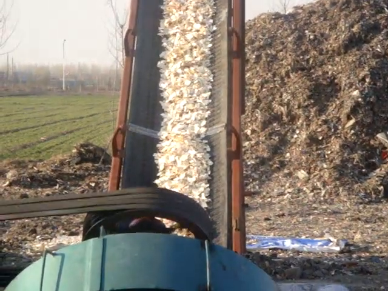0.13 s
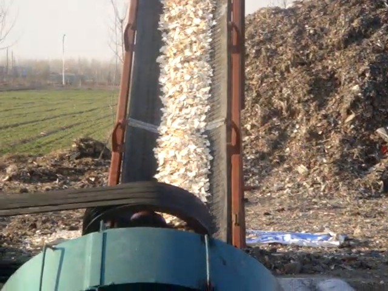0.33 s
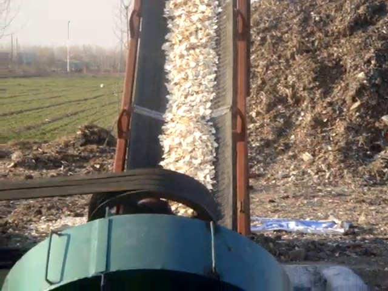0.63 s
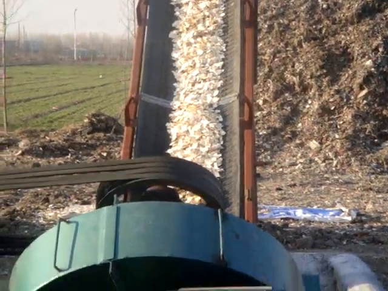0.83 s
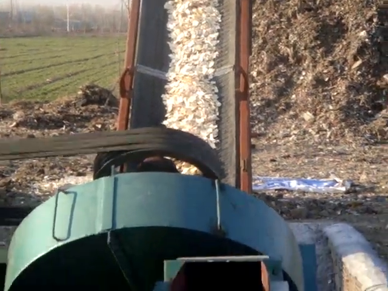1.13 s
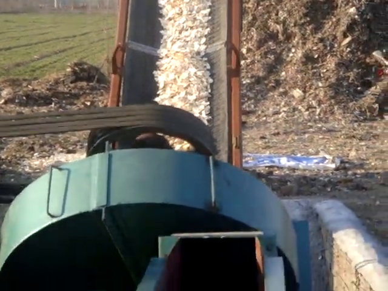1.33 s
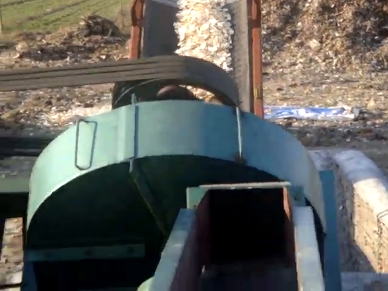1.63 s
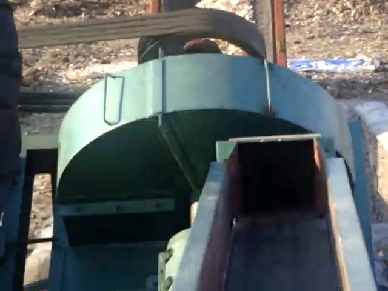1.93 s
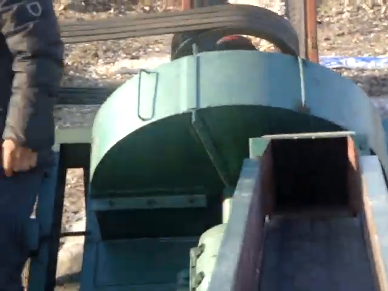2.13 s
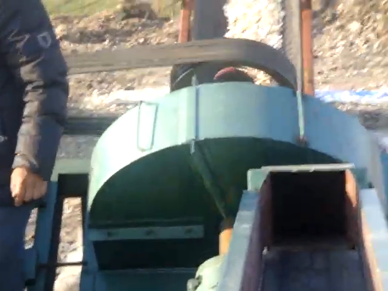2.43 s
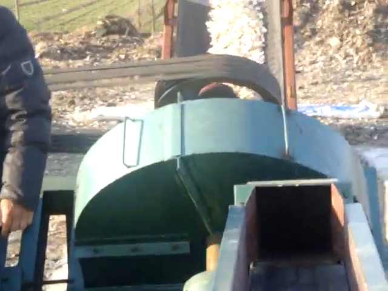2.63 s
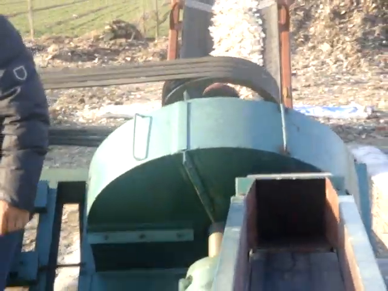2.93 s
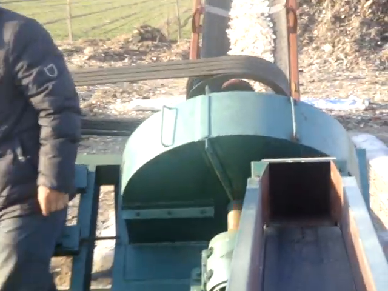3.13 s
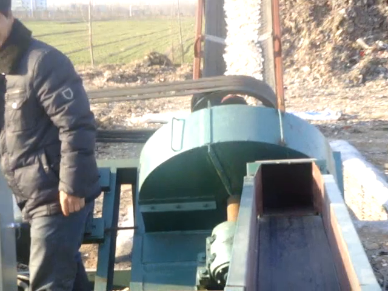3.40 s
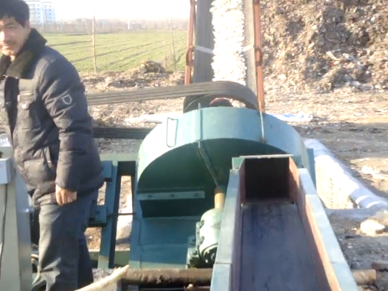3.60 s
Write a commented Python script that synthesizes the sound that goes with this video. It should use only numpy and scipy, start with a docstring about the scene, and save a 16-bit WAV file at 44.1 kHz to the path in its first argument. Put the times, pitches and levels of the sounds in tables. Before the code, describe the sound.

A large wood chipper roars and drones outdoors throughout, slowing slightly, with motor whine, a metallic ring and rapid swishing ticks. Dull wooden knocks come at intervals, and chips rattle over steel in short bursts until about 2.1 seconds. Wood cracks at 1.3 seconds. The roar peaks around 3 seconds, the strongest knock lands at 3.4, then the cutting eases under a thin hiss.

```python
"""A belt-driven disc chipper eats wood outdoors, its six-knife disc slowly losing speed under the load.
The knives roar and drone in the steel hood, fibres snap, the motor whines and a steel panel sings.
Once a turn the disc catches with a tick and a swish. Thick pieces knock, one cracks, and chips spray
over steel in short bursts; near the end the cut eases off under a thin hiss."""
import sys
import numpy as np
from scipy import signal
from scipy.fft import rfft, irfft, next_fast_len
from scipy.io import wavfile
from scipy.ndimage import uniform_filter1d, minimum_filter1d, map_coordinates

SR = 44100
rng = np.random.default_rng(int(sys.argv[2]) if len(sys.argv) > 2 else 0)


def bounce(signal):
    """Save signal as a 16-bit WAV file at the path given by the first command-line argument."""
    frames = np.transpose(np.atleast_2d(signal))
    limited = np.clip(frames, -1, 1)
    pcm = np.round(limited * 32767).astype(np.int16)
    wavfile.write(sys.argv[1], SR, pcm)


N = 165816
KNIVES = 6


def amp(db):
    """Decibels to gain."""
    return 10 ** (np.asarray(db) / 20)


def unit(x):
    """Scale to rms 1."""
    return x / np.sqrt(np.mean(x ** 2) + 1e-20)


def clock():
    """Time of every sample in seconds."""
    return np.arange(N) / SR


def curve(rows):
    """An automation lane: (t/s, value) rows joined by straight lines."""
    return np.interp(clock(), *np.transpose(rows))


def wobble(rate):
    """A smooth random curve, rate knots a second."""
    return map_coordinates(rng.standard_normal(int(N * rate / SR) + 4), [clock() * rate])


def filtered(x, response):
    """Filter x by a gain given as a function of frequency."""
    size = next_fast_len(N + SR // 2)
    return irfft(rfft(x, size) * response(np.fft.rfftfreq(size, 1 / SR)), size)[:N]


def colour(x, eq):
    """Shape x with an EQ curve of (f/Hz, relative level/dB) rows, then scale to rms 1."""
    hz, db = np.transpose(eq)
    return unit(filtered(x, lambda f: amp(np.interp(np.log(f + 1), np.log(hz), db))))


def noise(eq):
    """Coloured noise of rms 1."""
    return colour(rng.standard_normal(N), eq)


def ringing(x, resonances):
    """Each (f/Hz, width/Hz, boost/dB) resonance lifts its own band of x."""
    def bell(f, hz, width, db):
        damping = 1j * f * width / 2
        return 1 + (amp(db) - 1) * damping / (hz * hz - f * f + damping)
    return filtered(x, lambda f: np.prod([bell(f, *row) for row in resonances], axis=0))


def scatter(cycles, spread_db):
    """A new random gain for every cycle."""
    index = np.floor(cycles - np.floor(cycles[0])).astype(int)
    return amp(spread_db * rng.standard_normal(size=512)[index])


def tone(cycles, db, waver_db, drift_rad, rate):
    """A sine that wavers around the rms level db and drifts in phase."""
    level = amp(db + waver_db * wobble(rate)) * np.sqrt(2)
    return level * np.sin(2 * np.pi * (cycles + rng.random()) + drift_rad * wobble(rate))


def blow(start_s, decay_s, attack_s=0.0062):
    """Envelope of a woody hit: a rounded attack and an exponential tail."""
    age = np.maximum(clock() - start_s, 0)
    return (1 - np.exp(-age / attack_s)) * np.exp(-age / decay_s)


# EQ of the cutting roar (f/Hz, relative level/dB)
ROAR_EQ = [(25, -24), (70, -24.5), (130, -16.5), (200, -11), (400, -12), (520, -2), (750, -0.5),
           (1250, -2.5), (1900, -10), (2500, -14.5), (3200, -17), (4200, -24.5), (6000, -30),
           (10000, -38.5)]
# resonances of the steel hood, shared with the knocks (f/Hz, width/Hz, boost/dB)
HOOD_MODES = [(172.2, 26, 4), (209.6, 13, 5), (258.8, 21.4, 11.5), (334.5, 17.5, 14), (354.8, 18, 8.5),
              (512.5, 33, 6), (624, 58, 3), (823, 64, 5), (1642, 40, 4.5)]
# gain ride on the roar's upper mids (t/s, level/dB)
UPPER_MID_RIDE = [(0, -2), (1.2, -1), (1.7, .5), (2.3, -0.5), (3.1, 2), (3.5, 0), (3.76, 1.5)]

def cutting(turns, decay_gaps=0.75, depth=0.36):
    """Every knife tears off a slice: a burst of noise that rings in the hood."""
    cuts = turns * KNIVES
    bite = unit(np.exp(-(cuts % 1) / decay_gaps) * scatter(cuts, spread_db=0.5))
    tearing = (1 - depth + depth * bite) * rng.standard_normal(N)
    roar = unit(ringing(colour(tearing, ROAR_EQ), HOOD_MODES))
    upper_mids = filtered(roar, lambda f: (f > 870) & (f < 1410))
    return roar + (amp(curve(UPPER_MID_RIDE)) - 1) * upper_mids


# EQ of the snapping fibres (f/Hz, relative level/dB)
SPLINTER_EQ = [(600, -4), (1600, -15.5), (3300, 2), (5000, -16.5), (10000, -6.5)]

def splinters(snaps_per_s=120, decay_s=0.001):
    """Fibres snap at random moments, each a tiny grain of noise."""
    snaps = (rng.random(N) < snaps_per_s / SR) * amp(2 * rng.standard_normal(N))
    envelope = signal.lfilter([1], [1, -np.exp(-1 / (decay_s * SR))], snaps)
    return amp(-21.5) * colour(envelope * rng.standard_normal(N), SPLINTER_EQ)


KNIFE_RATE_DB = -32.5  # the drone's fundamental
# partials of the drone (multiple of the knife rate, level/dB added to the fader)
DRONE_PARTIALS = [(1, KNIFE_RATE_DB), (3, -28.5), (4, -28.5), (5, -27), (6, -16.5), (7, -13.5), (8, -18),
                  (9, -26.5), (10, -29), (11, -28.5), (13, -26)]
# fader of the drone (t/s, level/dB)
DRONE_FADER = [(0, -13), (.9, -7), (1.15, -17), (1.55, -9), (2.1, -8.5), (2.7, -9), (3.4, -3.5),
               (3.53, -26), (3.76, -22)]
# fader of the hum at twice the knife rate (t/s, level/dB)
HUM_FADER = [(0, -49.5), (2.55, -36.5), (3.15, -23.5), (3.45, -34), (3.76, -39)]

def drone(turns):
    """The passing knives drone in wavering harmonics of the knife rate."""
    cuts, level = turns * KNIVES, curve(DRONE_FADER)
    hum = tone(2 * cuts, curve(HUM_FADER), waver_db=2.5, drift_rad=0.32, rate=5)
    return hum + sum(tone(k * cuts, level + db, waver_db=2.5, drift_rad=0.35, rate=9.33)
                     for k, db in DRONE_PARTIALS)


# partials of the whine (multiple of the disc rate, level/dB added to the fader)
WHINE_PARTIALS = [(56.9, 1.5), (85.4, -4), (114.3, -16)]
# fader of the whine (t/s, level/dB)
WHINE_FADER = [(0, -23.5), (.9, -23), (1.2, -33), (2.4, -21.5), (2.9, -34), (3.4, -31), (3.76, -50)]

def motor(turns):
    """The motor's whine follows the disc, loosely, through the slipping belts."""
    return sum(tone(k * turns, curve(WHINE_FADER) + db, waver_db=3, drift_rad=0.85, rate=8)
               for k, db in WHINE_PARTIALS)


# fader of the panel, drawn to swell as the slowing machine nears its pitch (t/s, level/dB)
PANEL_FADER = [(0, -38), (1.8, -31), (2.45, -23), (2.9, -31), (3.38, -23), (3.58, -28), (3.76, -25)]

def panel(pitch_hz=820.5, octave_db=-14):
    """A steel panel sings at its own steady pitch, with a faint octave on top."""
    cycles, level = pitch_hz * clock(), curve(PANEL_FADER)
    return sum(tone(k * cycles, level + db, waver_db=3.5, drift_rad=0.4, rate=14)
               for k, db in [(1, 0), (2, octave_db)])


# EQ of the sharp tick (f/Hz, relative level/dB)
TICK_EQ = [(300, -21), (1500, -17), (3200, 6.5), (5000, -15.5), (10000, -19)]
# EQ of the airy swish (f/Hz, relative level/dB)
SWISH_EQ = [(1500, -36), (3500, 1), (5000, 1), (7000, 1), (10000, -0.5)]

def rub(turns, speed, tick_decay_s=0.0013):
    """Once a turn something on the disc catches: a sharp tick inside a swish."""
    tick_age = turns % 1 / speed
    tick = np.exp(-tick_age / tick_decay_s) * scatter(turns, spread_db=2)
    lead_s, attack_s, hold_s, decay_s = 0.0045, 0.0015, 0.016, 0.008  # the swish opens before the tick
    swish_turns = turns + lead_s * speed
    swish_age = swish_turns % 1 / speed
    swish = np.minimum(swish_age / attack_s, 1) * np.exp(-np.maximum(swish_age - hold_s, 0) / decay_s)
    swish *= scatter(swish_turns, spread_db=0.7)
    return amp(-13.5) * tick * noise(TICK_EQ) + amp(-23.5) * swish * noise(SWISH_EQ)


# cues for the thick pieces (t/s, level/dB)
KNOCK_CUES = [(.055, -10), (.28, -13), (1.575, -15), (1.865, -9.5), (2.38, -12), (2.74, -15), (3.42, -5)]
# EQ of the dull wooden body (f/Hz, relative level/dB)
KNOCK_EQ = [(200, -20), (500, 0), (850, -1), (1400, -10), (3000, -27), (8000, -46)]

def knocks():
    """Thick pieces meet the knives, each giving a dull blow in the hood."""
    envelope = sum(amp(db) * blow(start_s, decay_s=0.028) for start_s, db in KNOCK_CUES)
    return envelope * unit(ringing(noise(KNOCK_EQ), HOOD_MODES))


# cues for the bursts of chips (t/s, length/s, level/dB)
SPRAY_CUES = [(0.181, .035, -20.5), (0.444, 0.033, -23), (0.587, 0.023, -24), (1.068, 0.042, -21),
              (1.166, 0.041, -24), (1.227, 0.05, -22), (1.628, 0.036, -20.5), (2.112, 0.029, -19)]
# EQ of chips on steel (f/Hz, relative level/dB)
SPRAY_EQ = [(800, -19), (2500, 1), (4500, -5.5), (6500, -7.5), (10000, -14)]

def sprays(attack_s=0.0017, release_s=0.0045):
    """Handfuls of chips rattle over steel: short gated bursts of grainy noise."""
    gate = np.zeros(N)
    for start_s, length_s, db in SPRAY_CUES:
        age = clock() - start_s
        release = np.exp(-np.maximum(age - length_s + release_s, 0) / release_s)
        gate += amp(db) * np.clip(age / attack_s, 0, 1) * release
    rattle = unit(noise(SPRAY_EQ) * amp(1.7 * wobble(700)))
    return gate * rattle


# EQ of the crack (f/Hz, relative level/dB)
CRACK_EQ = [(700, -25), (1300, -1), (1650, -4), (2100, -14), (5000, -39)]

def crack():
    """A piece of wood cracks: one short clack, higher than the knocks."""
    return amp(-13) * blow(start_s=1.31, decay_s=0.029) * noise(CRACK_EQ)


# cues for the dips in level (t/s, depth/dB)
DIP_CUES = [(2.431, 7), (2.575, 7), (3.511, 8), (3.552, 9), (3.586, 3.5), (3.613, 6.5)]

def dips(width_s=0.0057):
    """A gain that ducks the machine briefly at each cue."""
    return amp(-sum(db * np.exp(-((clock() - at_s) / width_s) ** 2) for at_s, db in DIP_CUES))


# fader of the closing hiss (t/s, level/dB)
HISS_FADER = [(3.44, -51), (3.49, -30), (3.58, -28.5), (3.65, -30.5), (3.7, -42)]
# EQ of the hiss (f/Hz, relative level/dB)
HISS_EQ = [(3000, -31), (5500, -3), (7500, 2), (10000, -1.5)]

def easing(swell_at_s=3.57, swell_width_s=0.046):
    """A thin hiss and a soft low swell come in as the roar drops."""
    envelope = amp(-40) * np.exp(-((clock() - swell_at_s) / swell_width_s) ** 2)
    swell = envelope * noise([(30, -27), (60, -9), (200, -54), (1000, -100)])
    return amp(curve(HISS_FADER)) * noise(HISS_EQ) + swell


# the disc slowing down (t/s, speed/turns per second)
DISC_SPEED = [(0, 15.206), (.5, 15.146), (1, 15.043), (2, 14.764), (3, 14.478), (3.76, 14.32)]
# how hard the knives cut (t/s, level/dB)
LOAD_FADER = [(0, -9.5), (.25, -10.5), (.85, -10), (1.1, -12), (1.55, -10.5), (2.3, -10.5), (3, -4.5),
              (3.44, -7), (3.52, -14), (3.61, -17), (3.68, -17.5), (3.76, -14.5)]
# high ringing of the steel plates (f/Hz, width/Hz, boost/dB)
PLATE_MODES = [(3500, 100, 2.5), (4260, 100, 5.5), (4660, 110, 5), (4800, 61, 6.5), (5510, 51, 6),
               (6060, 110, 1.5), (7500, 63, 1), (8750, 94, 4.5), (9500, 100, 7)]

def scene(first_tick_s=0.0328):
    """The disc times the cuts, drone, whine and rub; the load rides the roar, splinters and rub."""
    speed, load = curve(DISC_SPEED), amp(curve(LOAD_FADER))
    turns = np.cumsum(speed) / SR - first_tick_s * speed[0]
    cut = load * (amp(-0.5) * cutting(turns) + splinters())
    machine = cut + knocks() + crack() + drone(turns) + motor(turns) + panel()
    chipper = dips() * machine + unit(load) * rub(turns, speed) + sprays()
    return (ringing(chipper, PLATE_MODES) + easing())[None]


def record(dry, ceiling=0.72, hold_s=0.0095, top_hz=10080):
    """Master chain: a fast limiter, a touch of lopsided distortion and a steep low-pass."""
    x = dry[0]
    span = int(hold_s * SR)
    limiter_gain = np.minimum(1, ceiling / (np.abs(x) + 1e-9))
    x = x * uniform_filter1d(minimum_filter1d(limiter_gain, span), span)
    x = x - 0.1 * filtered(x * x, lambda f: f / (f + 200))  # even harmonics, their lows rolled off
    return filtered(x, lambda f: 1 / np.sqrt(1 + (f / top_hz) ** 200))[None]


dry = scene()
out = record(dry)
bounce(out)
```